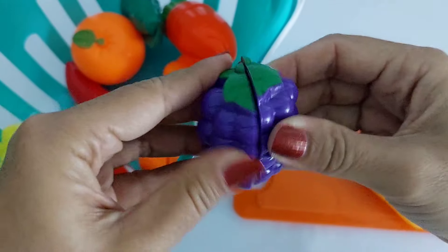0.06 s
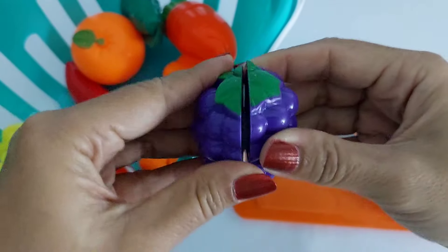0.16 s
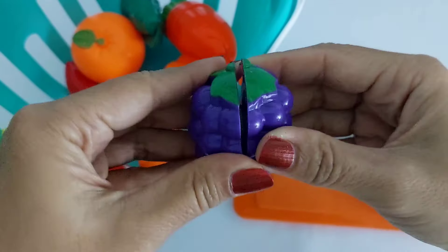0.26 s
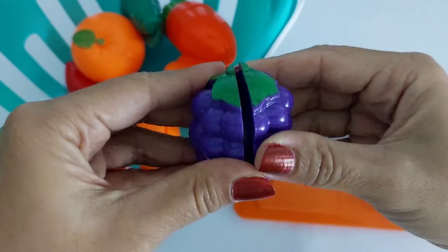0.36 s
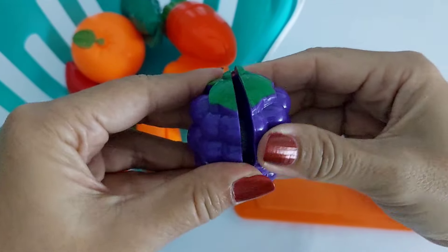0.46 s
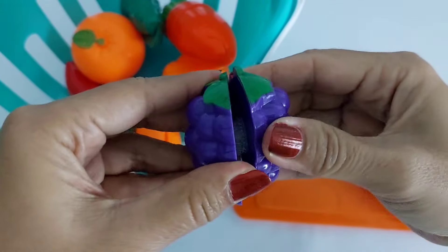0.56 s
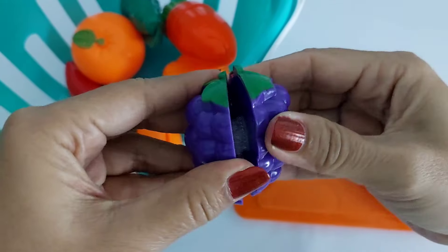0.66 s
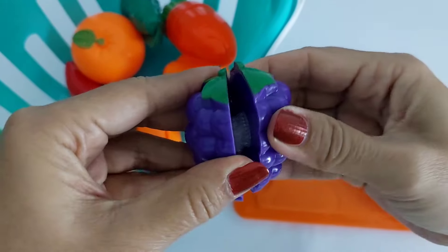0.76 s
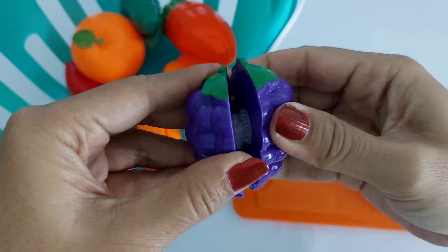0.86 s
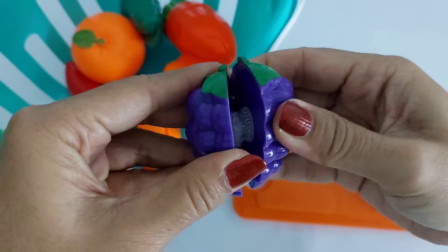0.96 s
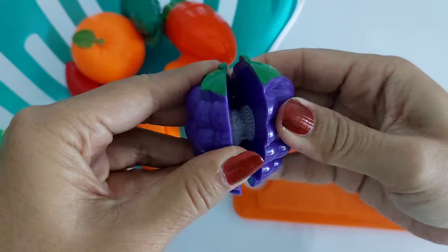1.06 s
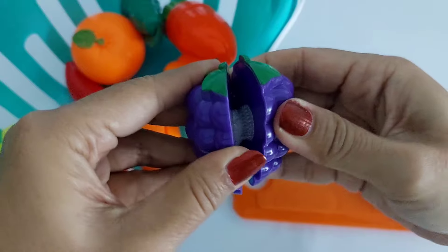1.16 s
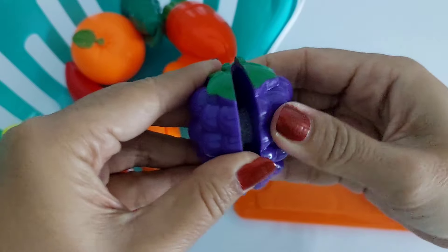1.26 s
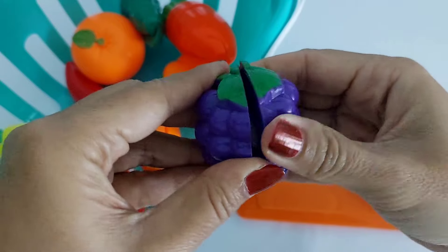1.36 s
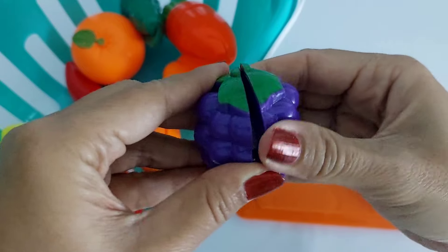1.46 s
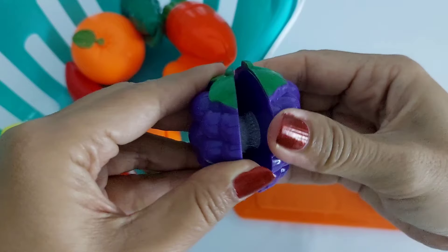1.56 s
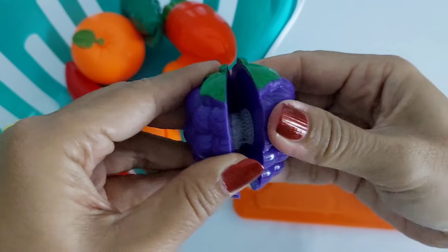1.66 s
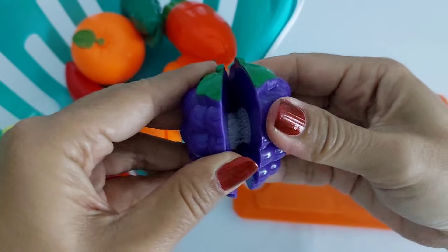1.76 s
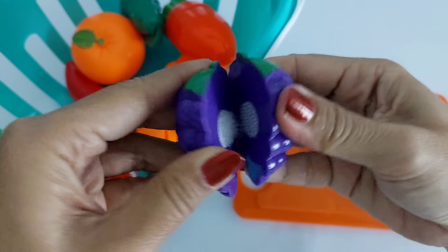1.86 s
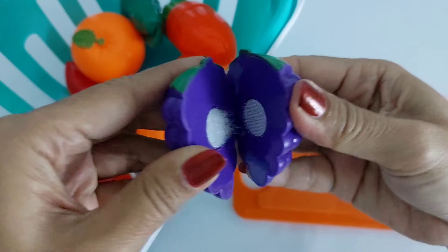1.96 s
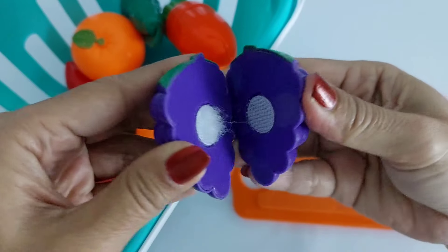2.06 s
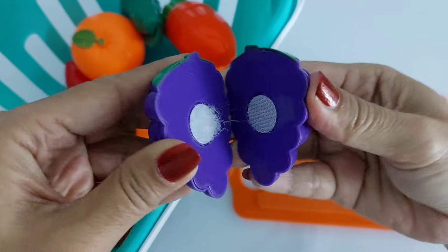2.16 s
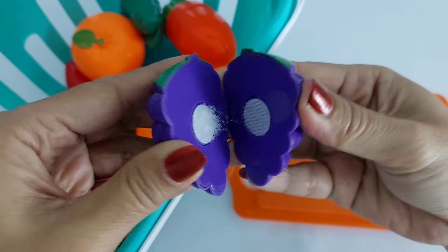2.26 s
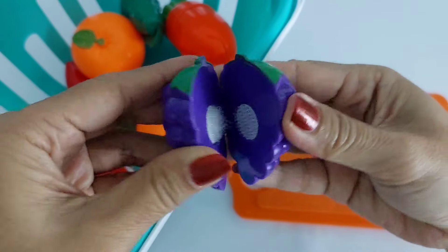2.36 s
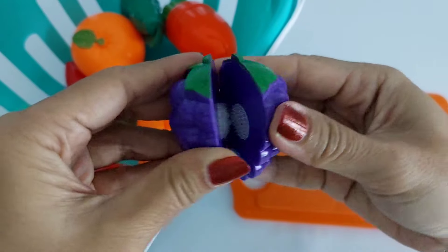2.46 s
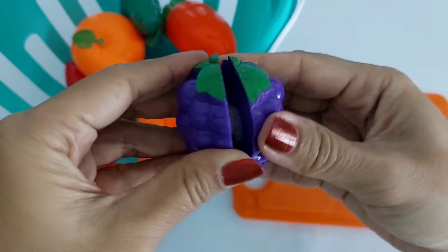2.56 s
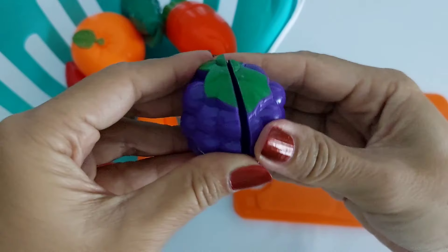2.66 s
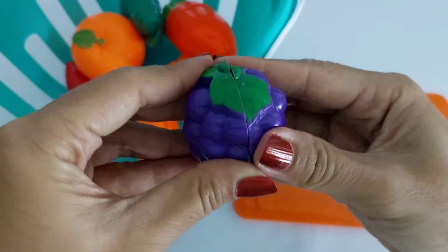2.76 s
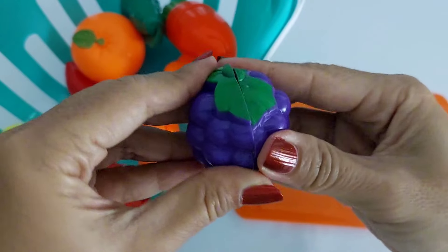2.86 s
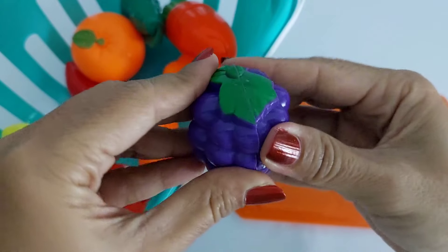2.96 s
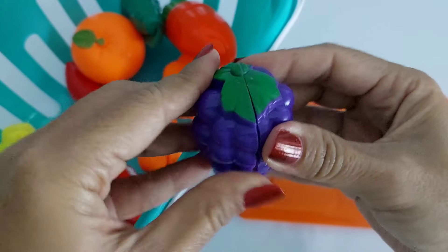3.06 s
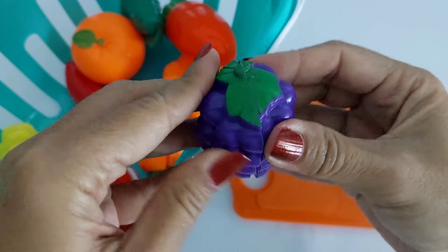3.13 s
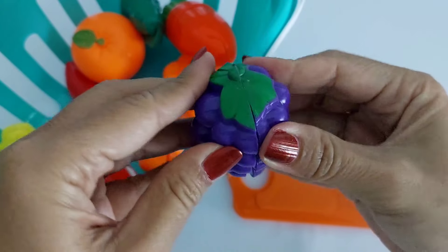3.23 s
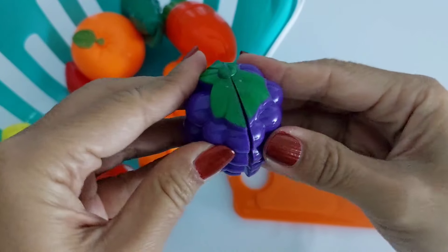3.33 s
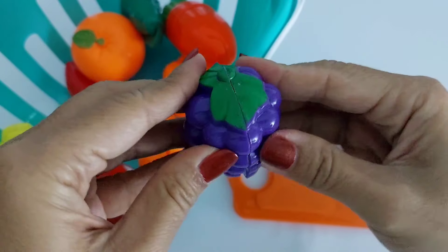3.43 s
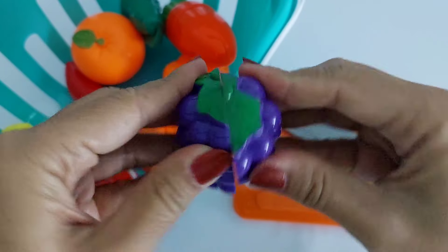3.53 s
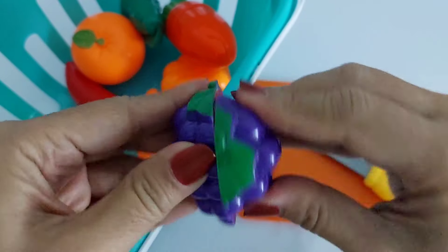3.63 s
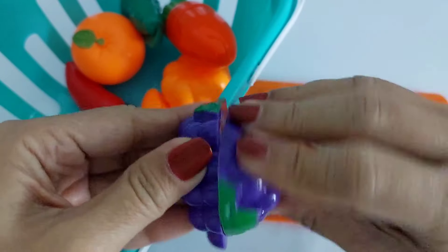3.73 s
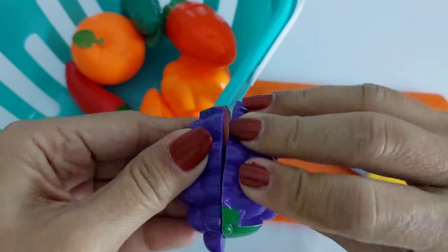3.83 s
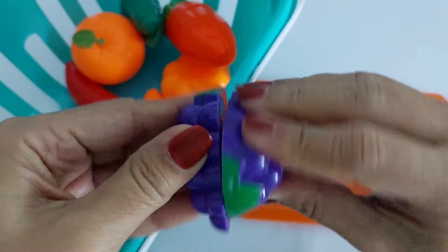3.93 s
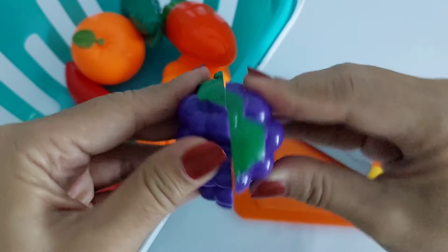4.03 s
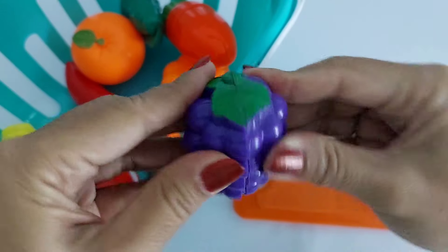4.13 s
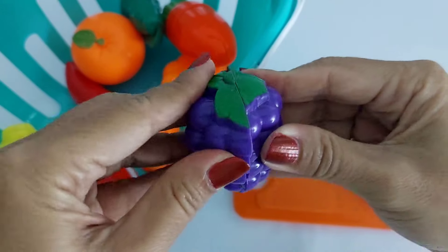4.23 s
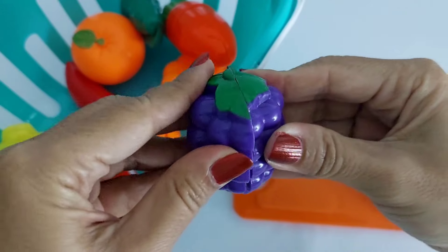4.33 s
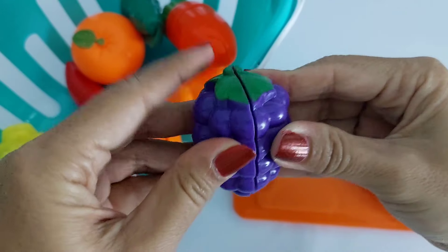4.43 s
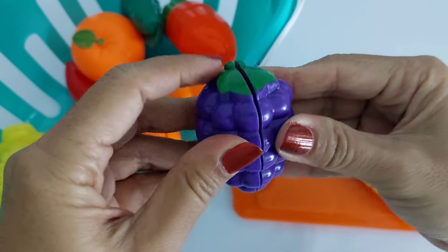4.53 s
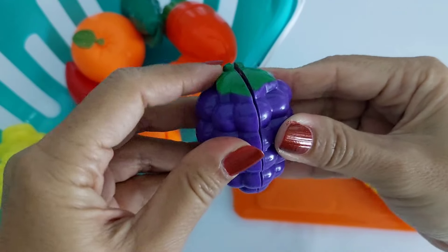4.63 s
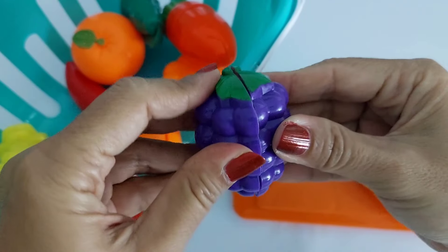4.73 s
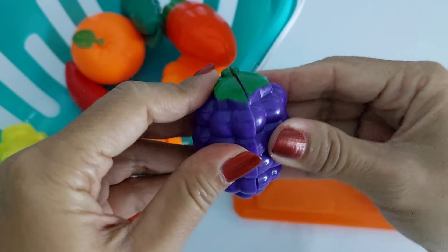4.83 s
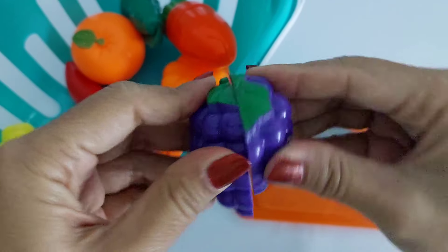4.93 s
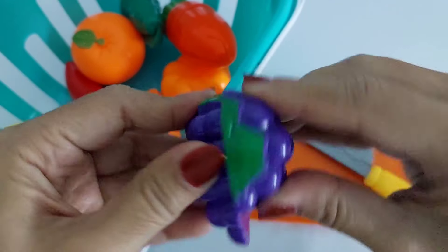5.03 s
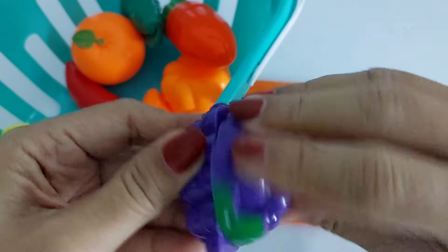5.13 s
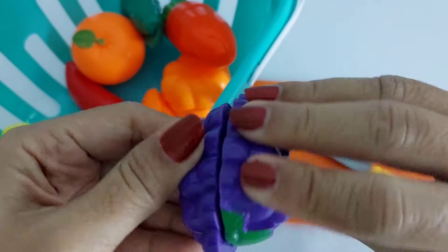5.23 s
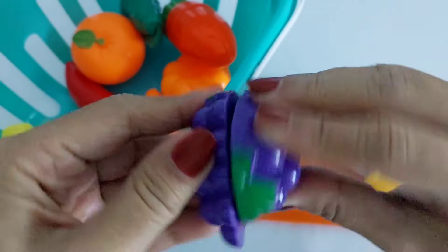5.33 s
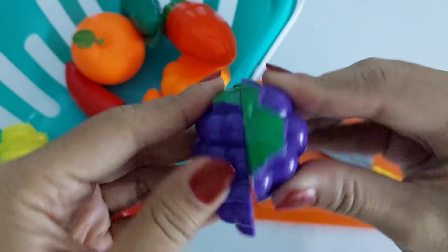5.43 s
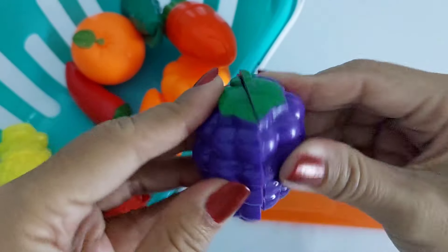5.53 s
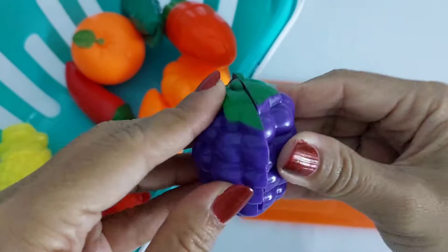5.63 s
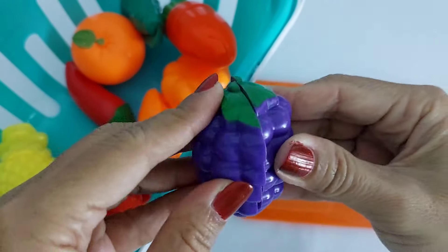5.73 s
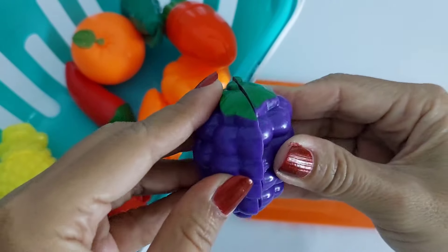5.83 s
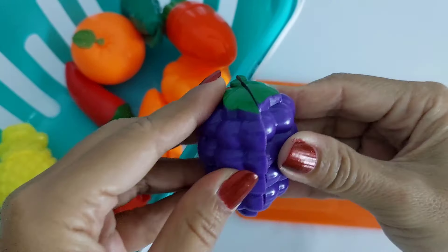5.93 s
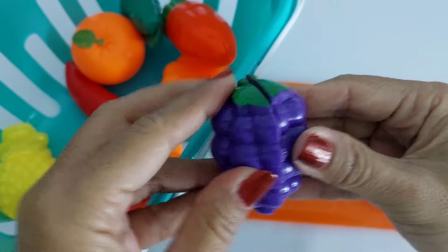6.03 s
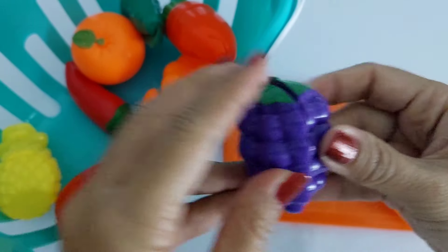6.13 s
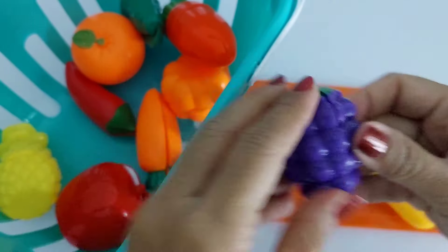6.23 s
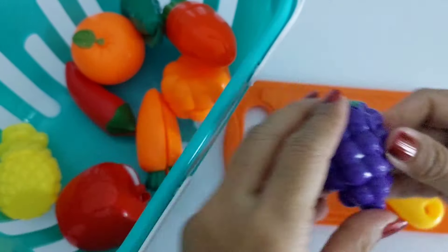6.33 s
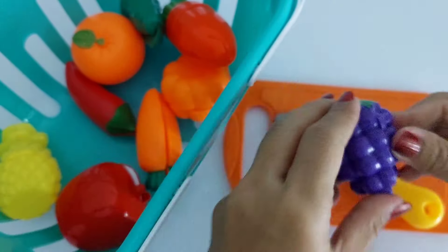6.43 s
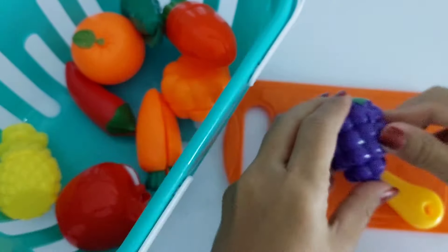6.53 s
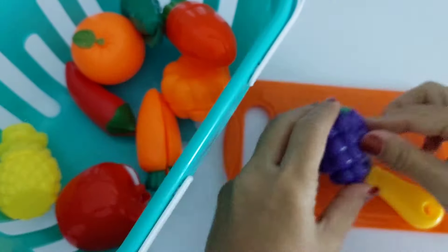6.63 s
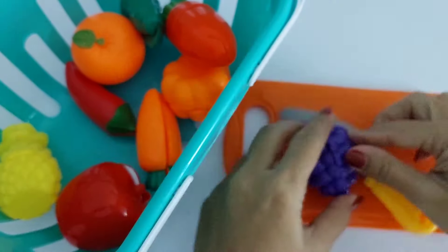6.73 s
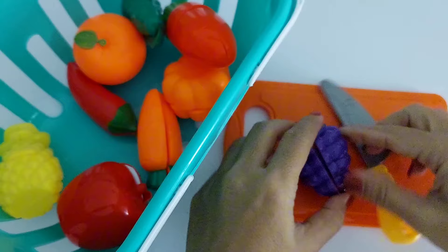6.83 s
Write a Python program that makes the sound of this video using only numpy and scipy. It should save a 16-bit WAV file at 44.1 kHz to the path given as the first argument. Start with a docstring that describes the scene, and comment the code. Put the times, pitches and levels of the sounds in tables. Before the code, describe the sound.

Hook-and-loop fastener crackles and rips as two hollow plastic toy halves are pulled apart, twisted and knocked down on a board indoors.

```python
"""Sharp plastic snaps and rasps come in bursts, as two hollow toy halves joined by a hook-and-loop pad
are pulled apart, twisted, pressed together and set down on a board with dull knocks.
Every hook that lets go strikes the shell's modes, which ring for a few milliseconds; the board has modes
of its own. A small hard room answers with decaying noise; a low rumble of shaped noise lies below."""
import sys
import numpy as np
from scipy import signal
from scipy.fft import rfft, irfft
from scipy.io import wavfile
from scipy.ndimage import uniform_filter1d

SR = 44100
rng = np.random.default_rng(int(sys.argv[2]) if len(sys.argv) > 2 else 0)


def put_to_file(sound):
    """Save the sound as 16-bit audio at rate SR, in the file named by the first command-line argument."""
    columns = np.atleast_2d(sound).T  # one column per channel
    safe = np.clip(columns, -1, 1)
    whole_steps = np.round(safe * 32767)
    wavfile.write(sys.argv[1], SR, whole_steps.astype(np.int16))


N = 303849


def from_db(db):
    """Turn a level in dB into an amplitude gain."""
    return 10 ** (np.asarray(db) / 20)


def rms_one(x):
    """Scale a sound to rms 1."""
    return x / np.sqrt(np.mean(x ** 2) + 1e-20)


def in_time(rows):
    """Draw the columns of an automation curve out sample by sample."""
    s, *columns = np.transpose(rows)
    t = np.arange(N) / SR
    return [np.interp(t, s, column) for column in columns]


def at_hz(points, hz):
    """Read a spectrum table on a logarithmic frequency axis."""
    point_hz, values = np.transpose(points)
    return np.interp(np.log(hz), np.log(point_hz), values)


def ring(clicks, hz, t60):
    """A unit click sets off a dying cosine of about height 1, with little leaking far below its pitch."""
    decay = from_db(-60 / (t60 * SR))   # per sample
    w = 2 * np.pi * hz / SR
    poles = [1, -2 * decay * np.cos(w), decay * decay]
    return signal.lfilter([.5, 0, -.5], poles, clicks + 1e-18)


def rumble():
    """Low rumble and faint hiss: steady coloured noise, with narrow booms where the room resonates."""
    # Colour of the bed. Each row: frequency in Hz, relative density in dB per Hz.
    bed_spectrum = [(20, -46), (45, -11.5), (70, -10), (110, -14), (200, -12), (350, -18.5), (600, -32.5),
                    (1200, -40), (4000, -47), (6500, -49.5), (8200, -39), (10000, -49.5), (16500, -53)]
    # Left-right likeness of the noise. Each row: frequency in Hz, correlation from 0 to 1.
    likeness = [(60, .88), (130, 0.83), (290, .5), (1000, 0.16), (4000, 0.015)]
    # Booming room modes. Each row: centre in Hz, width in Hz, average level in dB before panning.
    boom_modes = [(72.8, 3.5, -61), (119.9, 43, -64.5), (200, 4, -73)]
    # Swell of the two lowest booms, counted from each column's mean.
    # Each row: time in seconds, first boom in dB, second boom in dB.
    boom_swell = [(0.0, -56, -64.5), (0.09, -75.5, -67.5), (0.21, -66.5, -68.5), (0.9, -58.5, -64),
                  (1.88, -60.5, -61), (2.37, -71.5, -75), (2.88, -61, -62), (2.93, -62, -71),
                  (3.99, -65.5, -64.5), (4.17, -55.5, -60.5), (4.44, -66.5, -73), (5.19, -56.5, -56),
                  (5.32, -59.5, -66.5), (5.49, -53, -60.5), (5.75, -64.5, -70.5), (6.19, -64.5, -64.5),
                  (6.73, -59.5, -70.5), (6.75, -60, -62.5)]
    bed_db, pan_db = -65.5, 4.5   # bed rms before panning; left over right

    hz = np.maximum(np.fft.rfftfreq(N, 1 / SR), 1)
    alike = np.clip(at_hz(likeness, hz), 0, 1)
    opposite = np.array([[1], [-1]])   # left, right

    def coloured(shape):
        """Shape mid and side noise so that the two ports are as alike as the table says."""
        mid, side = rfft(rng.standard_normal((2, N)))
        both = np.sqrt(1 + alike) * mid + np.sqrt(1 - alike) * side * opposite
        return rms_one(irfft(shape * both, N))

    bed = from_db(bed_db) * coloured(from_db(at_hz(bed_spectrum, hz)))
    first_db, second_db = in_time(boom_swell)
    swells_db = [first_db - first_db.mean(), second_db - second_db.mean(), 0]
    for (centre, width, db), swell_db in zip(boom_modes, swells_db):
        boom = coloured(1 / (1 + (2 * (hz - centre) / width) ** 2))
        # level the noise into a steady drone with a wavering pitch
        power = uniform_filter1d(np.mean(boom ** 2, axis=0), size=SR // 8)
        boom = boom / np.sqrt(power + 0.089)
        bed = bed + from_db(db + swell_db) * boom
    return bed * from_db(pan_db / 2 * opposite)


def room(x):
    """A dense tail for each port: broad bands of noise, each dying at its own rate."""
    # Reverb bands. Each row: centre in Hz, t60 in seconds, relative starting level in dB.
    bands = [(450, 0.34, 2.5), (1370, 0.25, 2), (2955, 0.38, -3), (5500, 0.38, -2), (11090, 0.25, 0)]
    fade_in_s = 0.0095   # the walls answer late
    t, tail = np.arange(SR // 2) / SR, 0
    for hz, t60, db in bands:
        band = signal.butter(2, [hz / np.sqrt(3), hz * np.sqrt(3)], "band", fs=SR, output="sos")
        noise = signal.sosfilt(band, rng.standard_normal((2, len(t))))
        tail = tail + noise * from_db(db - 60 * t / t60)
    tail = tail * np.clip(t / fade_in_s, 0, 1) ** 2
    tail = tail / np.sqrt(np.sum(tail ** 2) / 2)   # unit energy per port on average
    return signal.fftconvolve(x, tail, axes=1)[:, :N]


def knocks():
    """The toy rocks on the board: soft, dull blows set the board's modes ringing."""
    # Blows. Each row: start in seconds, relative level in dB.
    blows = [(6.776, -25.5), (6.791, -26), (6.8116, -31), (6.817, -24.5), (6.8194, -23.5), (6.8381, -21.5),
             (6.847, -28), (6.8582, -28.5), (6.8663, -30), (6.876, -32)]
    # Board resonances. Each row: frequency in Hz, relative level in dB, t60 in seconds.
    board_modes = [(80.6, -15, 0.24), (307, -17, 0.017), (483, -12, 0.013), (663, -17.5, 0.22),
                   (850, -7, 0.018), (1023, 0.5, 0.022), (1110, -1.5, 0.018), (1267, -1.5, 0.027),
                   (1500, 0, 0.0044), (1730, -4.5, 0.016), (2540, -11, 0.0092), (3520, -20, 0.0044),
                   (5700, 2, 0.0035)]
    contact_hz = 2560   # a soft contact carries little above this
    s, blow_db = np.transpose(blows)
    at = (s * SR).astype(int)
    out, chance = np.zeros(N), rng.standard_normal((len(s), len(board_modes)))
    for k, (hz, level_db, t60) in enumerate(board_modes):
        clicks = np.zeros(N)
        sign = (-1) ** k
        clicks[at] = sign * from_db(blow_db + level_db + 3.86 * chance[:, k])
        out += ring(clicks, hz, t60)
    out = signal.sosfilt(signal.butter(2, contact_hz, fs=SR, output="sos"), out)
    return out * from_db([[-1.5], [1.5]])   # leaning right


def apart(at):
    """True at samples where the halves stand open."""
    open_s, close_s = .45, 2.5
    return (at > open_s * SR) & (at < close_s * SR)


def shell(at, level_db, bright_db, pan_db, scatter_db, aim_db):
    """Each hook strikes every mode with its own strength; the high modes beam unevenly to the two ports."""
    # Shell resonances. Each row: frequency in Hz, t60 in seconds, relative level in dB with the halves
    # apart, relative level in dB with the halves closed.
    shell_modes = [(420, 0.0041, -27, -28.5), (1122, 0.0058, -13.5, -16.5), (1380, 0.0036, -17, -13.5),
                   (1840, 0.0049, 0, -27), (2450, 0.0055, 0.5, -6), (3135, 0.0048, 3.5, -0.5),
                   (3607, 0.0058, 7, 0), (3996, 0.0051, 4, -0.5), (4860, 0.0038, 1.5, -1),
                   (5450, 0.0035, -4.5, 1.5), (6800, 0.0027, 0.5, -5), (7660, 0.0032, 1.5, -15),
                   (7820, 0.0015, -5, 3), (9740, 0.0031, 3, -1), (10880, 0.0031, -4, -6.5),
                   (12050, 0.0018, 4, 0.5), (12900, 0.00078, 8.5, 4), (15100, 0.0015, -2, 1)]
    # Direct sound, then hands and table top. Each row: nominal delay in seconds, level in dB.
    near_echoes = [(0, -2.5), (.0005, -6), (.0012, -5.5), (.0021, -6.5), (.0031, -10), (.0046, -14)]
    shell_low_hz = 373   # a body this small radiates little below here
    beam_hz = 6000       # beaming grows with pitch and levels off above about here

    out = np.zeros((2, N + SR // 10))
    modes_hz, t60s, apart_db, closed_db = np.transpose(shell_modes)
    chance = rng.standard_normal((len(at), len(shell_modes), 3))
    octaves = np.log2(np.maximum(modes_hz, 1500) / 4000)
    colour_db = np.where(apart(at)[:, None], apart_db, closed_db)
    colour_db = colour_db + np.outer(bright_db, octaves) + scatter_db * chance[:, :, 0]
    # the colour shares out the strength of the snap: its power averages 1 over the modes
    colour_db = colour_db - 10 * np.log10(np.mean(from_db(2 * colour_db), axis=1, keepdims=True))

    echo_s, echo_db = np.transpose(near_echoes)
    # each hook draws its own echo delays by chance, a little different at each port
    delays = echo_s * rng.uniform(.7, 1.3, (len(at), len(echo_s)))
    signs = rng.choice([-1, 1], (len(at), len(shell_modes), len(echo_s)))
    for side, toward in enumerate([1, -1]):   # left, right
        port_delays = delays * rng.uniform(0.95, 1.02, delays.shape)
        arrive = at[:, None] + (SR * port_delays).astype(int)
        for k, (hz, t60) in enumerate(zip(modes_hz, t60s)):
            beam_db = aim_db * np.tanh(hz / beam_hz) * chance[:, k, 1 + side]
            strike_db = level_db + colour_db[:, k] + beam_db + toward * pan_db / 2
            sizes = from_db(strike_db)[:, None] * from_db(echo_db) * signs[:, k]
            clicks = np.bincount(arrive.ravel(), sizes.ravel(), out.shape[1])
            out[side] += ring(clicks, hz, t60)
    low_cut = signal.butter(3, shell_low_hz, "high", fs=SR, output="sos")
    return signal.sosfilt(low_cut, out[:, :N])


def stroke_db(t):
    """Each pull, twist or bump builds, holds and stops; a curve of small slips sets the least level."""
    # Level of the small hook slips before, between and under the strokes.
    # Each row: time in seconds, relative level in dB.
    small_slips = [(0.15, -61), (0.38, -83.5), (0.75, -56.5), (1.1, -59.5), (1.4, -73.5), (1.67, -76.5),
                   (1.94, -53), (2.3, -96), (3.5, -82), (3.67, -41.5), (3.9, -68), (3.99, -58), (4.09, -39),
                   (4.25, -63), (4.45, -83), (4.85, -77), (4.96, -56), (5.1, -34), (5.33, -63), (5.6, -52),
                   (5.8, -95), (6.05, -79.5), (6.26, -64), (6.52, -80.5)]
    # Pulls, twists and bumps, many small hooks slipping together. Each row: full from in seconds,
    # let go in seconds, relative level in dB when full, relative level in dB when let go.
    strokes = [(0, 0.038, -39.5, -49.5), (1.013, 1.158, -41, -41), (1.894, 1.94, -27.5, -31.5),
               (2.652, 2.84, -72, -74.5), (3.006, 3.208, -70.5, -71.5), (3.355, 3.421, -66, -69.5),
               (3.713, 3.735, -25.5, -27), (3.789, 3.852, -23, -34.5), (4.119, 4.213, -30.5, -33.5),
               (5.129, 5.241, -25, -31), (5.431, 5.65, -36, -39.5), (6.7722, 6.77, -17, -26),
               (6.8, 6.88, -42.5, -41)]
    twists_from_s, twists_to_s = 3.5, 6.0   # the closed halves are twisted between these times
    # twists build slowly, pulls and bumps start at once; all die fast
    twist_db_per_s, sudden_db_per_s, stop_db_per_s = 450, 11999.5, 599.5

    level_db = np.interp(t, *np.transpose(small_slips))
    for full, let_go, full_db, end_db in strokes:
        build = twist_db_per_s if twists_from_s < full < twists_to_s else sudden_db_per_s
        held_db = np.interp(t, [full, let_go], [full_db, end_db])
        before_db = build * np.maximum(full - t, 0)
        after_db = stop_db_per_s * np.maximum(t - let_go, 0)
        level_db = np.maximum(level_db, held_db - before_db - after_db)
    return level_db


def rasp():
    """Small hooks slip at random times in uneven clumps, mostly weak, a few strong, and ring the shell."""
    slips_per_s, clump_db, clumps_per_s = 1100, 2, 90
    at = np.flatnonzero(rng.random(N) < slips_per_s / SR)
    size_db = 3.9 * np.minimum(rng.exponential(1, len(at)), 3.5)
    clumps = rng.uniform(-1, 1, 1000)
    uneven_db = clump_db * np.interp(at / SR * clumps_per_s, np.arange(len(clumps)), clumps)
    level_db = stroke_db(at / SR) + uneven_db + size_db - 16.5
    bright_db = np.where(apart(at), -3.5, -.6)   # dB per octave: open halves sound fuller
    return shell(at, level_db, bright_db, np.zeros(len(at)), scatter_db=1.5, aim_db=7.0)


def snaps():
    """Single hooks let go one by one, each a distinct snap that rings all the shell's modes."""
    # Hooks letting go. Each row: start in seconds, relative level in dB.
    hooks = [(0.1009, -44.5), (0.161, -39.5), (0.2118, -41.5), (0.3035, -49.5), (0.3522, -27.5),
             (0.567, -13.5), (0.656, -19.5), (0.674, -22.5), (0.6873, -13.5), (0.694, -18.5), (0.7042, -27),
             (0.7718, -18), (0.789, -29), (0.8155, -32), (0.824, -18.5), (0.8345, -13), (0.8387, -12.5),
             (0.856, -24), (0.9673, -16.5), (0.9997, -14.5), (1.0123, -13), (1.0207, -9), (1.0271, -12),
             (1.0314, -16), (1.0376, -15.5), (1.058, -16), (1.0655, -9.5), (1.0855, -13.5), (1.1175, -11),
             (1.128, -21), (1.1398, -7), (1.1525, -12), (1.1653, -14), (1.3309, -39), (1.3681, -41.5),
             (1.617, -16), (1.6607, -32), (1.729, -33.5), (1.777, -14.5), (1.8404, -19), (1.8526, -9),
             (1.8564, -11), (1.866, -13), (1.8858, -9.5), (1.893, -7), (1.8985, -4.5), (1.9116, -8.5),
             (1.9215, -6), (1.9267, -10), (1.9339, -6.5), (1.948, -9), (1.9598, -15), (1.9909, -11),
             (2.0249, -14.5), (2.7269, -56.5), (2.7851, -53), (2.8, -49), (3.0182, -50.5), (3.046, -48),
             (3.1346, -52), (3.1876, -53.5), (3.3488, -41), (3.5032, -51), (3.5842, -39), (3.5917, -37),
             (3.601, -31), (3.61, -30.5), (3.648, -16), (3.6583, -21.5), (3.693, -18.5), (3.712, -30),
             (3.732, -24), (3.7587, -24.5), (3.767, -22), (3.7862, -19.5), (3.803, -19), (3.843, -20.5),
             (3.9976, -38), (4.0046, -32.5), (4.032, -31.5), (4.056, -23), (4.102, -21), (4.1128, -16),
             (4.123, -28), (4.1426, -21), (4.1504, -19), (4.164, -19.5), (4.1786, -17), (4.204, -32),
             (4.213, -18.5), (4.23, -17), (4.3, -30), (4.348, -28.5), (4.435, -41), (4.4847, -45.5),
             (4.7703, -42), (4.7918, -44), (4.812, -44), (4.9332, -32), (4.9634, -32), (4.991, -29),
             (5.031, -27.5), (5.045, -21), (5.0863, -17.5), (5.114, -23.5), (5.14, -21), (5.158, -20.5),
             (5.178, -20.5), (5.1905, -18), (5.2025, -19), (5.2112, -15), (5.2286, -21.5), (5.2333, -21),
             (5.24, -18), (5.2466, -16), (5.2732, -21), (5.379, -27.5), (5.401, -17), (5.4526, -19),
             (5.463, -21), (5.4728, -18), (5.4804, -19), (5.4958, -14), (5.501, -14.5), (5.52, -15.5),
             (5.5284, -18), (5.5344, -18.5), (5.5604, -18.5), (5.5698, -16), (5.5894, -23), (5.6013, -16),
             (5.62, -19), (5.6492, -18), (5.6639, -22.5), (6.0288, -50), (6.1246, -16.5), (6.2372, -47),
             (6.3117, -50), (6.4676, -54), (6.6913, -55), (6.776, -15)]
    # Brightness of the snaps over time, some dull and some sharp.
    # Each row: time in seconds, average brightness in dB per octave.
    brightness = [(0, -0.5), (.57, 4), (.8, -1), (1.17, -3.5), (1.62, 3), (1.78, -4), (2.03, -2),
                  (2.8, -5.5), (3.04, 5), (3.19, -5.5), (3.35, 6), (3.5, -6.5), (3.6, 4.5), (4.9, 2.5),
                  (5.6, 2), (6.3, 3), (6.47, -8.5), (6.78, 0)]
    bright_spread_db = -0.5                # per octave, chance from hook to hook
    pan_db, pan_spread_db = -0.24, 2       # left over right, and its chance
    s, hook_db = np.transpose(hooks)
    at, chance = (s * SR).astype(int), rng.standard_normal((len(s), 2))
    bright_db = in_time(brightness)[0][at] + bright_spread_db * chance[:, 0]
    place_db = pan_db + pan_spread_db * chance[:, 1]
    # 9 dB off, since many modes add up to the snap
    return shell(at, hook_db - 9, bright_db, place_db, scatter_db=2.0, aim_db=2.5)


def scene():
    """Toy and board, close by, in the room over its rumble."""
    port_lag = 7   # samples by which the right microphone port hears the toy later
    room_db = -10
    toy = snaps() + rasp()
    toy[1] = np.concatenate([np.zeros(port_lag), toy[1, :-port_lag]])
    near = toy + knocks()
    return near + from_db(room_db) * room(near) + rumble()


def record(dry):
    """The microphone drops the deepest bass, the tallest peaks are rounded and the top is cut."""
    ceiling = .98         # full scale is 1
    cutoff_hz = 16400     # 80 dB down from here up
    dry = signal.sosfilt(signal.butter(2, 28, "high", fs=SR, output="sos"), dry)
    rounded = ceiling * np.tanh(dry / ceiling)
    return signal.sosfilt(signal.cheby2(20, 80, cutoff_hz, fs=SR, output="sos"), rounded)


dry = scene()
out = record(dry)
put_to_file(out)
```